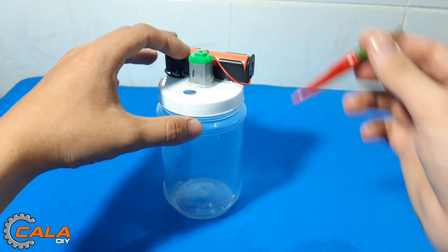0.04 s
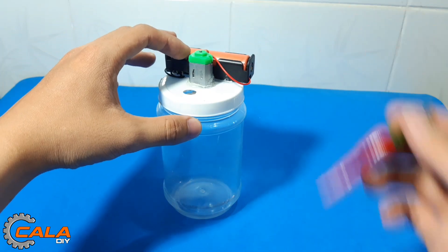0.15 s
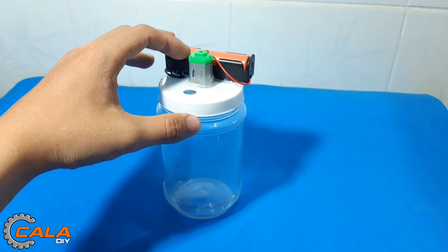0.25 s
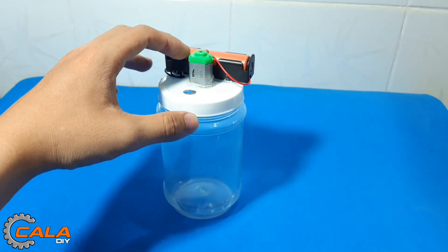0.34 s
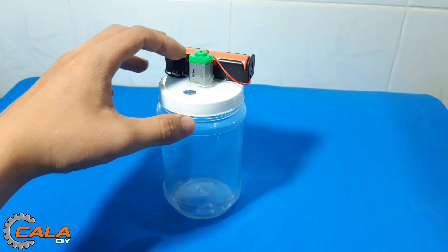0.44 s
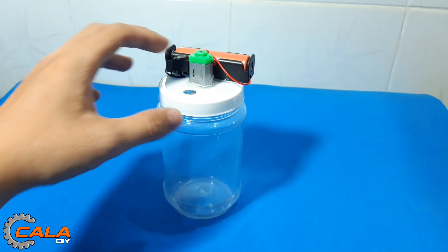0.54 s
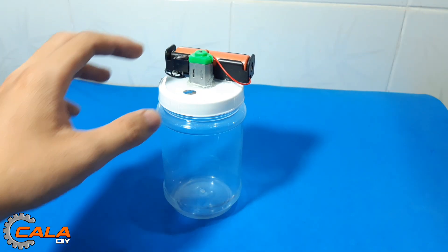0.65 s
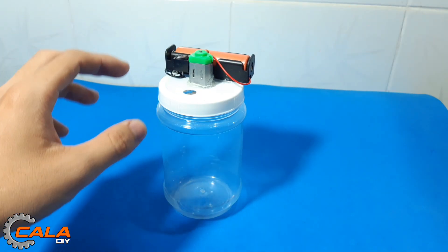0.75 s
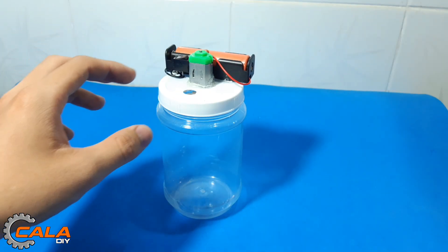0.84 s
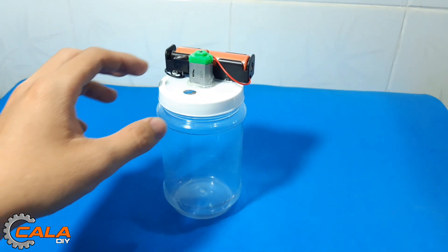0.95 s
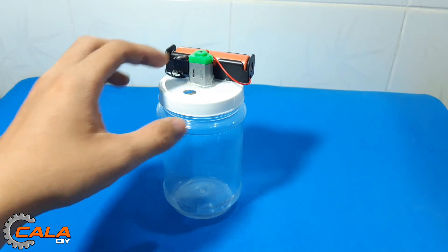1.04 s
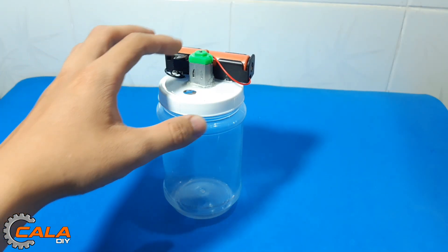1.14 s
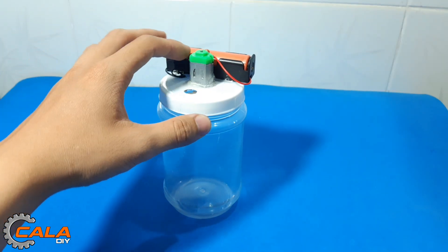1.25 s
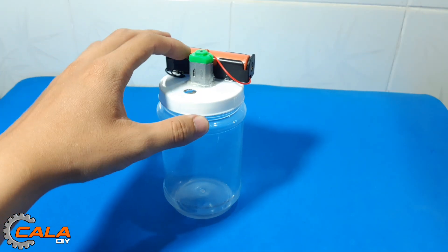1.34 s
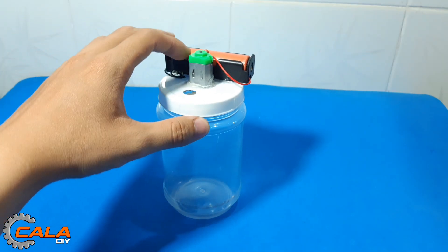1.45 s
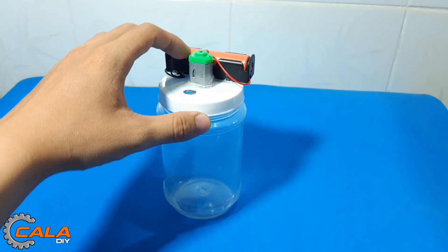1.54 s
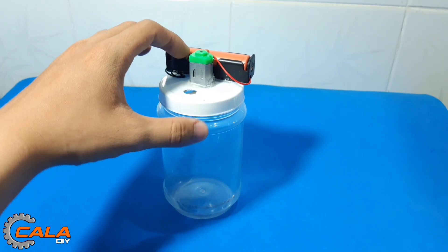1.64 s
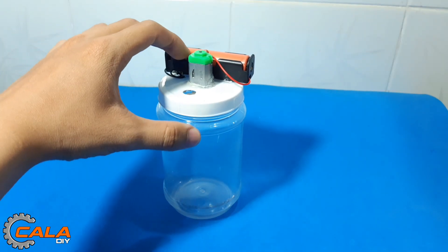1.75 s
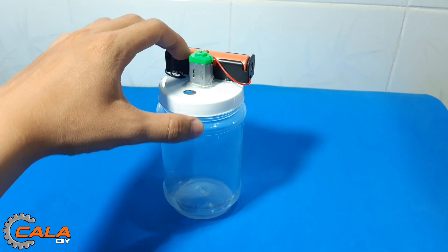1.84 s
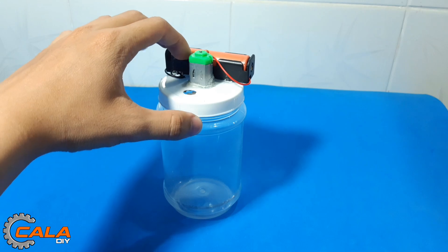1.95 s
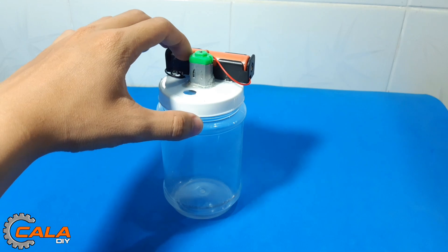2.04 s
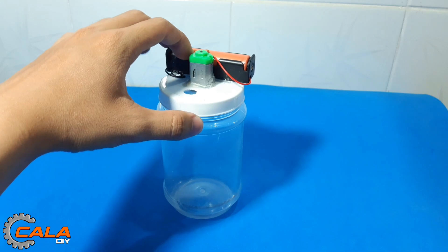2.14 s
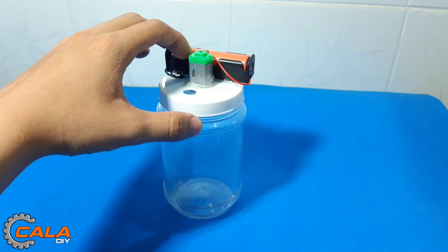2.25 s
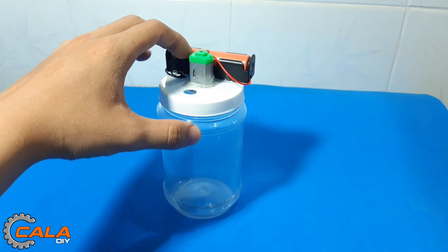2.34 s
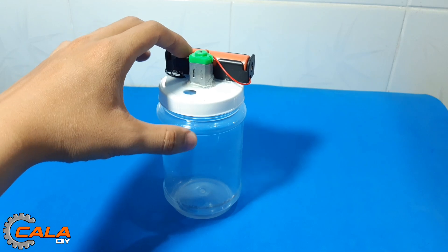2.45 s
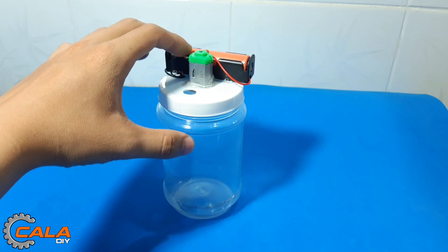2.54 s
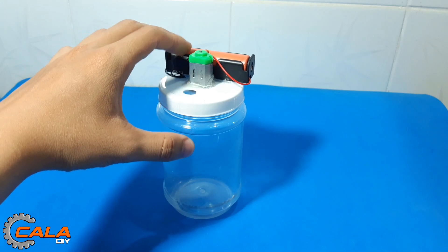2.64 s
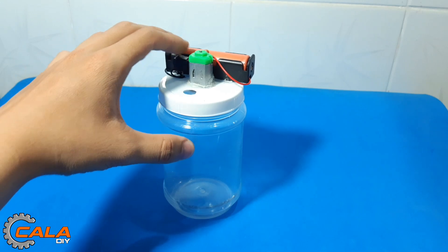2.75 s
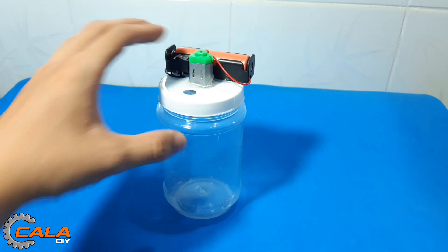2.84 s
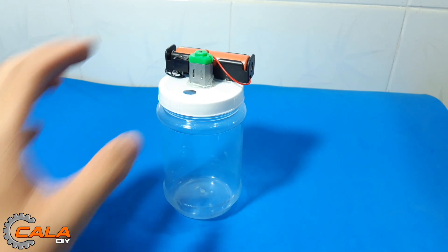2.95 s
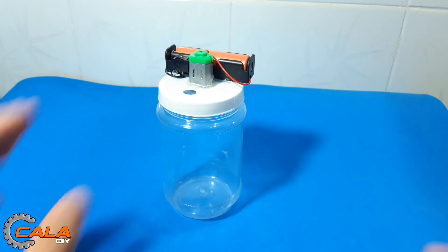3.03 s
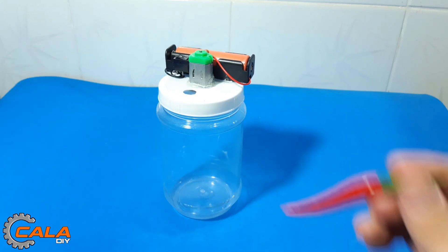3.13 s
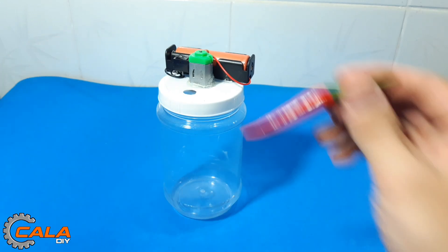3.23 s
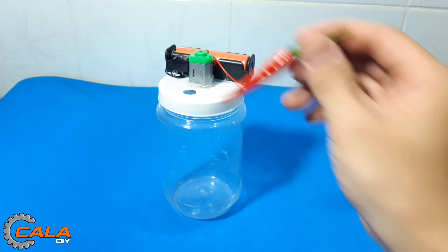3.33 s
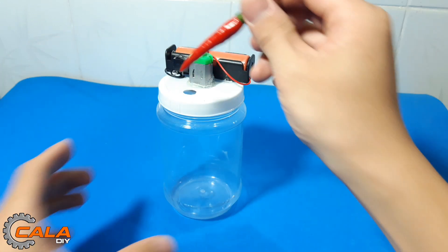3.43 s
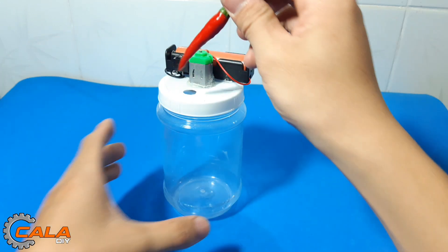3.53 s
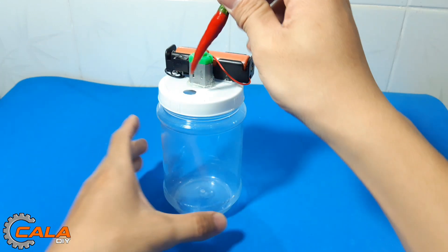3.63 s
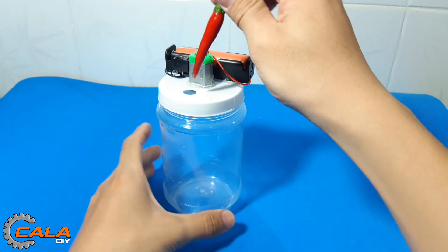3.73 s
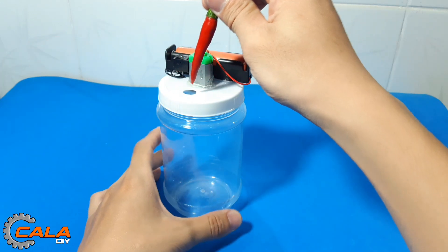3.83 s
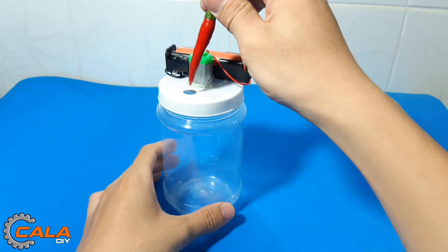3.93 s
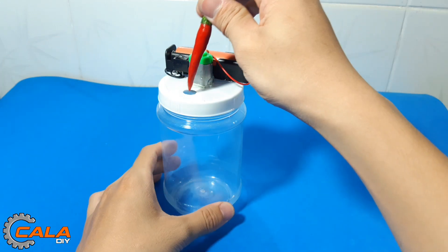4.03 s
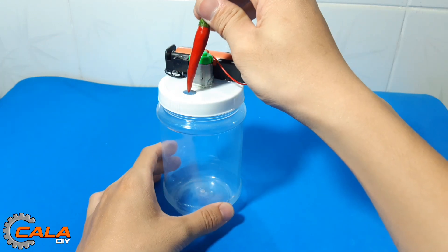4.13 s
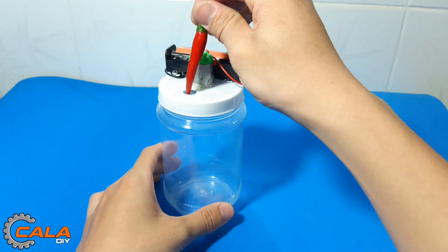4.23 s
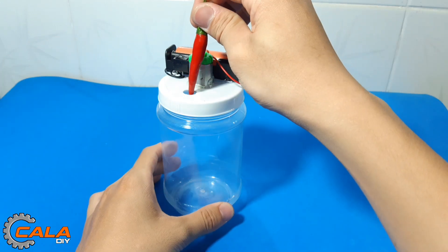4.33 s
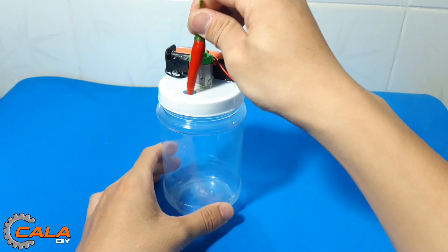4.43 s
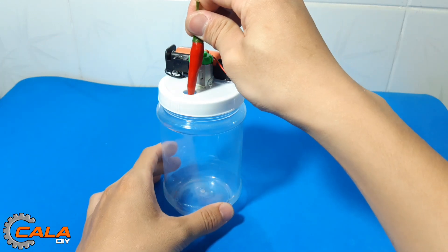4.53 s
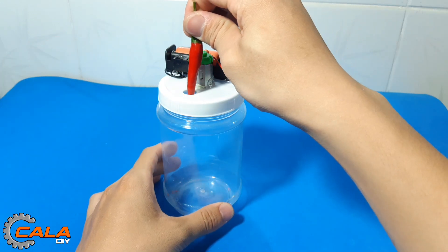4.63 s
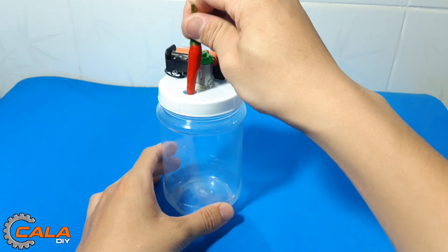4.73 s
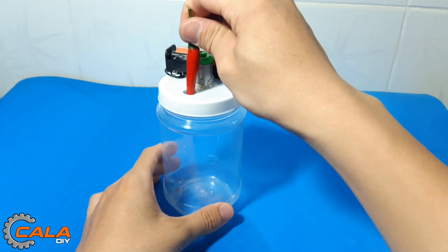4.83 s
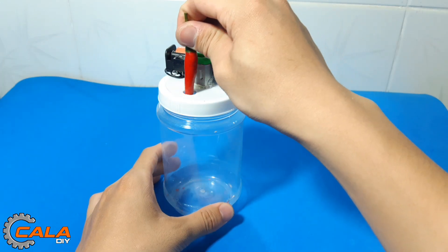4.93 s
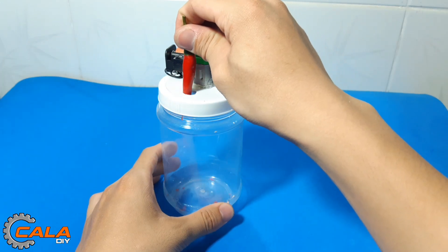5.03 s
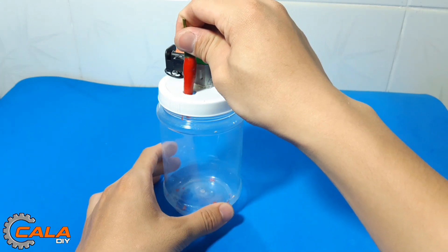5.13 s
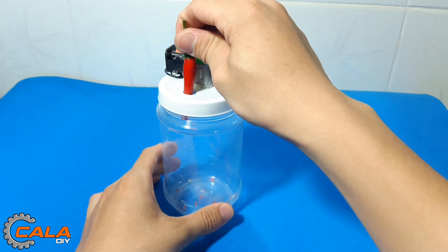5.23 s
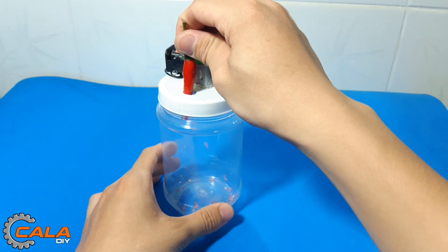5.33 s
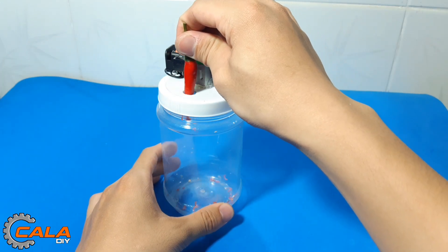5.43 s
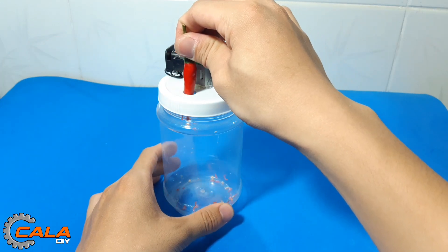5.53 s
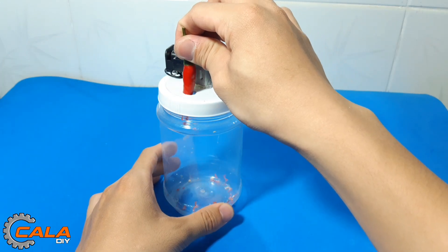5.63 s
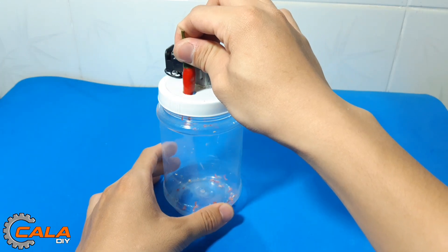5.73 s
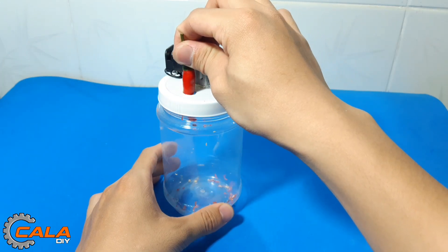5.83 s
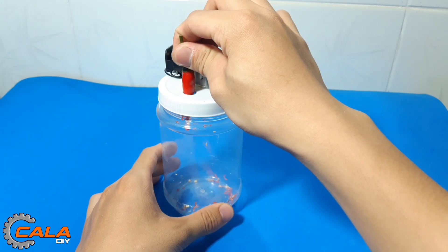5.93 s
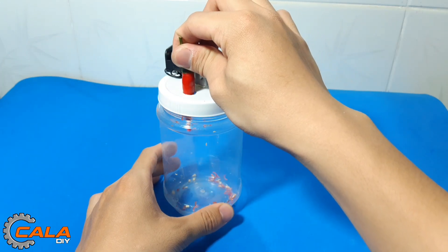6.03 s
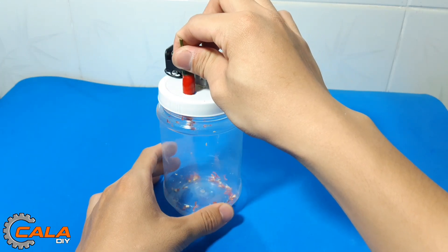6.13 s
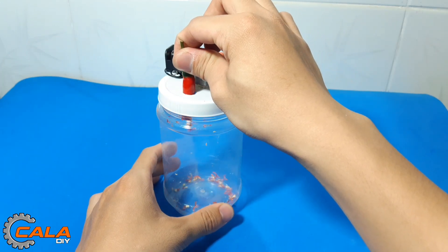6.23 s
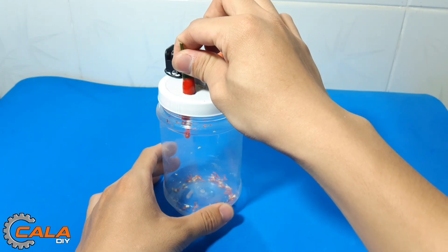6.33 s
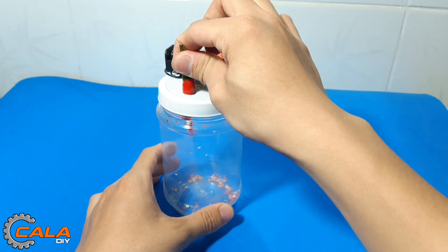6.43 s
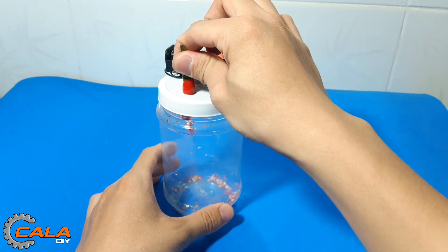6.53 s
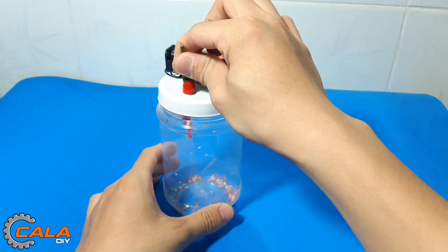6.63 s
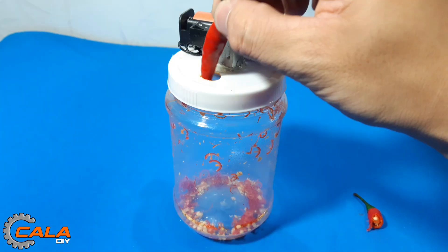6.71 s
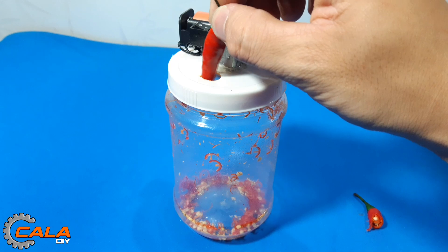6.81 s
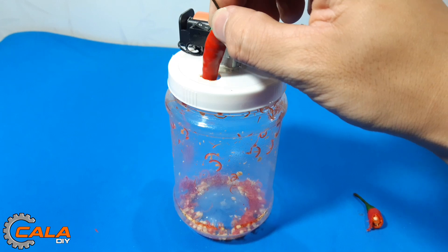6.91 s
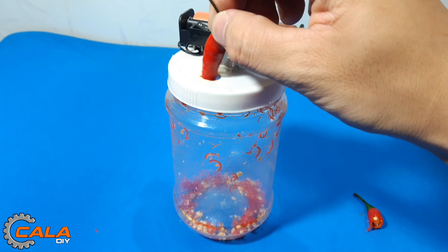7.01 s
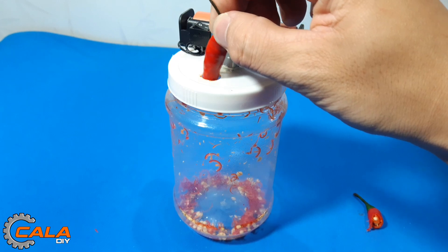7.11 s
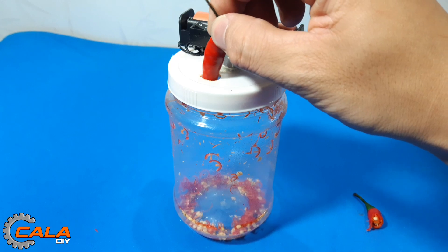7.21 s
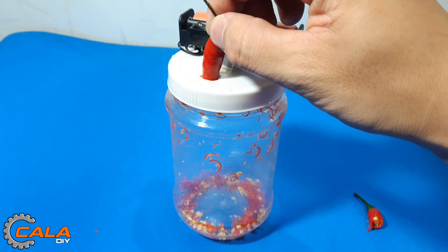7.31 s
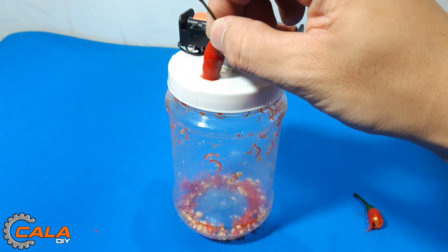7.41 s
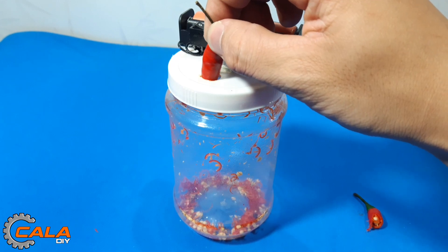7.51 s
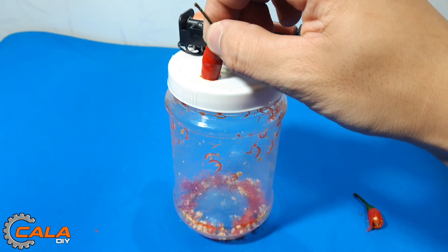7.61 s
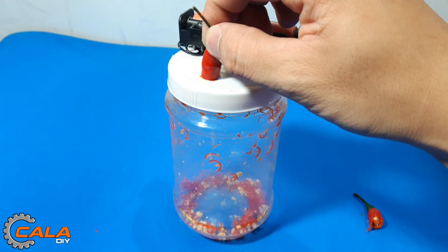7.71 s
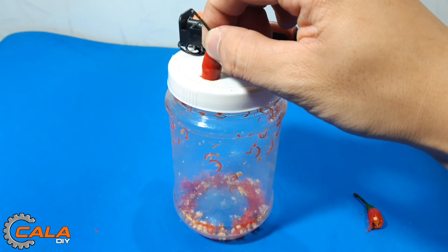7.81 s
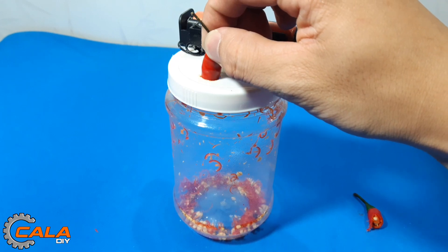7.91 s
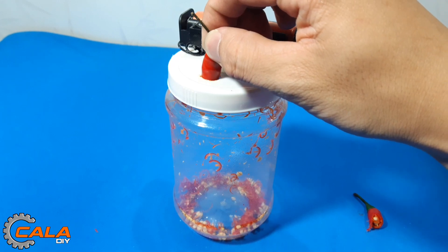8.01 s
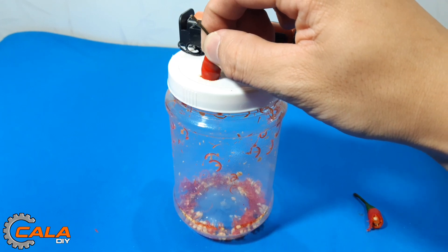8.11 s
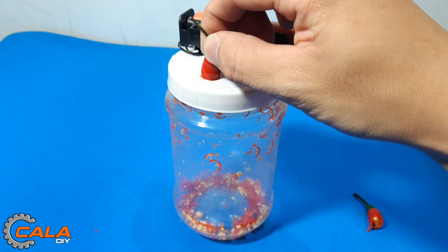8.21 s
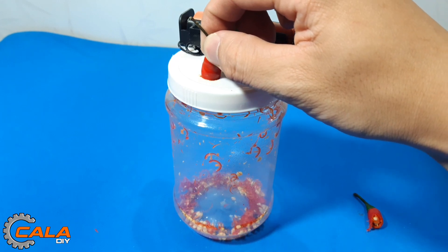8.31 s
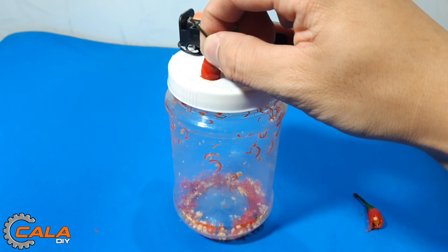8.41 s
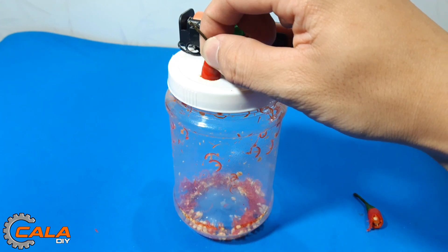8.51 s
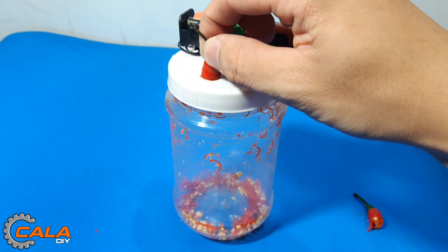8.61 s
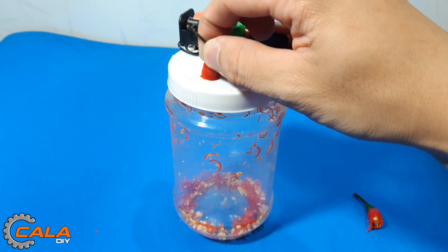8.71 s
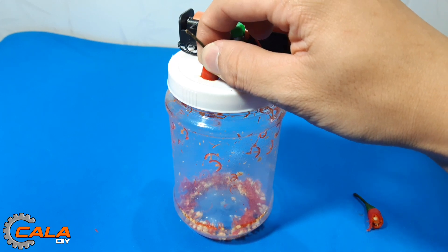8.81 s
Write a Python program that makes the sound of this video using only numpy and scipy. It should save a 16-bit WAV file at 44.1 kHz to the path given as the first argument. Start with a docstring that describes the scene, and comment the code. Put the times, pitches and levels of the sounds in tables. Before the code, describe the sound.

Finger clicks on plastic, then a small motor snaps on and hums steadily atop a jar, until a pepper makes it rattle, growl and nearly stall.

```python
"""A low hum and distant rumble, then a finger clicks on a battery holder, close by in a tiled room.
A small brushed motor on the plastic lid of a jar cracks on, runs up and hums with a comb of shaft orders.
A pepper is fed to its blade, which knocks it once a turn and tears it twice a turn, while the shaft
labours, nearly stalls and recovers. Shaped noise and tones locked to the shaft angle make the machine,
decaying bursts the finger. Two unlike microphone ports stand close by."""
import sys
import numpy as np
from scipy import signal
from scipy.fft import rfft, irfft, next_fast_len
from scipy.io import wavfile
from scipy.ndimage import uniform_filter1d

SR = 44100
rng = np.random.default_rng(int(sys.argv[2]) if len(sys.argv) > 2 else 0)


def waveform_to_disk(signal):
    """Save audio, clipped to [-1, 1], as 16-bit WAV at the path in sys.argv[1]."""
    frames = np.transpose(np.atleast_2d(signal))
    scaled = np.clip(frames, -1, 1) * 32767
    samples = np.round(scaled).astype(np.int16)
    wavfile.write(sys.argv[1], SR, samples)


N = 390726
TIME = np.arange(N) / SR  # s

ON_S, BITE_S = 2.07, 4.249  # switch-on; the pepper first touches the blade
LABOUR_S, LET_GO_S = 4.83, 6.9  # the shaft starts to drum on the lid; the hand lets go of the jar
FULL_HZ = 188.8  # full shaft speed
POLES = 3  # of the commutator

# The labouring shaft. Each row: time in seconds, speed in Hz, level of order two in dB,
# strength of the other orders in dB.
LOADED = [(4.84, 154.4, -43, -10.5), (5.03, 150.5, -41, 1), (5.12, 109.8, -35, -2), (5.17, 109.6, -38, -4),
          (5.26, 154.9, -41, 1), (5.34, 143.7, -46, -0.5), (5.52, 155.6, -40, -5.5), (5.63, 146.5, -43, 1),
          (5.68, 135.8, -32, 7.5), (5.73, 91.5, -43, 0), (5.79, 91.2, -41, -0.5), (6.07, 139.6, -36.5, 0.5),
          (6.16, 94.36, -40, -2), (6.21, 121.5, -34.5, -2), (6.46, 80.2, -55, 1), (6.62, 124.3, -33, 0),
          (6.98, 102.5, -45, -2.5), (7.06, 142, -44, -2), (7.11, 132.3, -34, 4), (7.17, 105.3, -38, 3),
          (7.23, 137.0, -38, -2), (7.29, 146.1, -43, -2), (7.35, 132.6, -35, -1), (7.46, 174.6, -57, 5),
          (7.55, 123.3, -33.5, 2), (7.61, 110.7, -50, -2.5), (7.69, 114.3, -37.5, 1),
          (7.78, 139.7, -41, -1), (7.82, 115.3, -38, 7.5), (7.88, 61.46, -48, -2), (8.01, 51.14, -61, 12),
          (8.1, 85.15, -58, -1), (8.22, 92.3, -43.5, -1), (8.34, 91.3, -46, 0.5), (8.46, 164.2, -46, 1),
          (8.55, 168.6, -66, -2), (8.6, 116.8, -33, 3), (8.65, 106.8, -56, -1), (8.76, 133.9, -36, -2),
          (8.85, 134.0, -50, -5)]
# How alike the two ports hear a spread source. Each row: frequency in Hz, likeness 0-1.
ALIKE = [(100, 0.94), (700, 1), (1400, 0.98), (2500, 0), (4500, 0), (7000, 0.43), (10000, 0)]


def shaft():
    """Speed in Hz, its smoothed rate of change in Hz/s, turns made so far, and whether it is on."""
    # Free at first, then dragged down by the pepper. Each row: time in seconds, run-up speed in Hz.
    speed = [(2.3, 192), (2.54, 192.7), (2.88, 190.7), (2.95, 189.2), (3.11, 190), (3.36, 188.8),
             (3.67, 188.5), (3.82, 190.3), (4.04, 194), (4.24, 192.7), (4.32, 186.2), (4.42, 184.2),
             (4.48, 158.3), (4.66, 175.4), (4.8, 164.9)]
    run_up_s, head_start_s = .07, .015
    on = TIME > ON_S
    since = np.maximum(TIME - ON_S + head_start_s, head_start_s)
    hz = curves(speed + [row[:2] for row in LOADED])[0] * (1 - np.exp(-since / run_up_s))
    gain = uniform_filter1d(np.gradient(hz) * SR, size=SR // 30)
    flutter = 1 + .0009 * wobble(40)
    return hz, gain, np.cumsum(on * hz * flutter) / SR, on


def motor(hz, gain, turns, on):
    """Unbalance, comb of orders, moving air and brushes sound together once the current is on."""
    running = hum(turns) + whine(hz, gain, turns) + air(turns) + sparks(turns) + buzz(hz, turns)
    return contact() + on * running


def hum(turns):
    """Unbalance shakes the lid at the first three orders, until the shaft labours."""
    # The hum as the grip on the jar changes.
    # Each row: time in seconds, rms levels of orders one, two and three in dB.
    hum_levels = [(2.07, -66, -63, -70), (2.15, -50, -36.5, -52), (2.21, -42, -40, -37.5),
                  (2.41, -33.5, -42.5, -36.5), (3.0, -35.5, -39, -35.5), (3.72, -37, -37.5, -34),
                  (4.24, -32, -46, -31), (4.32, -55, -39, -24.5), (4.42, -70, -44, -27.5),
                  (4.5, -51, -39.5, -40), (4.66, -42, -33.5, -39), (4.8, -51, -36, -41.5)]
    tones = 0
    for k, db in enumerate(curves(hum_levels)):
        tones = tones + np.sqrt(2) * amp(db) * np.cos(2 * np.pi * (k + 1) * turns + 1.43 * k)
    return tones * (TIME <= LABOUR_S)


def whine(hz, gain, turns):
    """One turn's waveform repeats with the shaft angle, slowly changing shape."""
    # The comb of weak orders at full speed. Each row: frequency in Hz, relative level in dB.
    comb_levels = [(760, -50), (1500, -57.5), (2500, -54.5), (3500, -52.5), (4400, -54.5), (6000, -56.5),
                   (8200, -66.5), (10500, -60.5), (13000, -61.5), (15400, -65), (19000, -61)]
    # Orders that sing out of the comb: one row of shaft orders.
    singing = (4, 5, 6, 7, 8, 9, 11, 13, 14, 15, 22, 27, 30, 31, 33, 36, 54, 58, 60, 62, 63, 68, 77)
    # Each row: relative level in dB of every singing order, in the same sequence.
    singing_levels = [(-42.5, -55.5, -55, -58.5, -55.5, -48, -54, -54, -44.5, -46, -44.5, -42, -42.5, -54, -55, -52.5, -47, -50, -58, -46.5, -56, -47, -60),
                      (-45, -58, -61, -55, -52, -52, -52, -49, -39.5, -60, -45, -47, -51, -42, -60, -53, -46, -49, -58, -57, -47, -54, -67),
                      (-47, -52.5, -52, -54, -54.5, -42.5, -45, -40.5, -57, -47, -45, -41, -41.5, -54, -63, -55, -50, -48, -41.5, -52, -66, -49, -59)]
    # When each of those rows holds: one row of times in seconds.
    settled_times = (2.92, 3.08, 3.8)
    top_order, scatter_db, smear_turns = 105, 6.5, .012
    loaded = TIME > BITE_S

    order = np.arange(singing[0], top_order + 1)
    comb_db = along(comb_levels, order * FULL_HZ) + scatter_db * rng.standard_normal(len(order))
    comb_db = comb_db - 2 * (order % POLES == 0)  # multiples of three are a little weaker here
    comb = amp(comb_db) * ~np.isin(order, singing)  # outside the singing orders

    # load and run-up shake the timing
    smear = smear_turns * (loaded + .06 + np.clip(gain / 900, 0, 1)) * wobble(400)
    at = (turns + smear) % 1 * 4096
    angle = 2 * np.pi * np.arange(4097)[:, None] / 4096

    def turn(k, size, phase):
        """One turn summed from its orders, read at the shaft angle."""
        wave = (np.sqrt(2) * size * np.cos(k * angle + phase)).sum(1)
        return np.interp(at, np.arange(4097), wave)

    # the comb: a steady turn, and lesser ones that come and go, slowly and fast
    tones = 0
    for share in (1, .7 * wobble(3), .6 * wobble(7), .15 * wobble(60)):
        tones = tones + share * turn(order, comb, rng.uniform(0, 2 * np.pi, len(order)))
    phase = rng.uniform(0, 2 * np.pi, len(singing))
    for db, now in zip(singing_levels, np.eye(len(settled_times))):
        fade = np.interp(TIME, settled_times, now)
        tones = tones + fade * turn(np.array(singing), amp(db), phase) * amp(1.5 * wobble(12))
    # the load damps the whine, which grows steeply with speed
    return amp(-7 * loaded + 75 * np.log10(hz / FULL_HZ)) * tones


def air(turns):
    """Blade wind and brush hiss: noise that swells a little once a turn."""
    # Colour of the wind. Each row: frequency in Hz, relative level in dB per Hz.
    wind_colour = [(60, -16), (190, -9.5), (570, -13), (1000, -24), (1500, -22), (2800, -15), (3600, -29),
                   (5500, -23.5), (7000, -28), (9000, -36), (12000, -25.5), (15500, -34)]
    wind = unit(filtered(pair(ALIKE), lambda f: amp(along(wind_colour, f))))
    catch_s = .02  # time constant of the wind's rise
    level_db = -45 - 24 * np.exp(-np.maximum(TIME - ON_S, 0) / catch_s)
    return amp(level_db) * wind * (1 + .21 * np.cos(2 * np.pi * turns))


def sparks(turns):
    """Brushes spark at each pole during the run-up: noise pulses that swell and die."""
    # Colour of the sparks. Each row: frequency in Hz, relative level in dB per Hz.
    spark_colour = [(700, -23), (1600, -9), (2400, 3), (3300, -12), (5500, -2), (8500, -15), (11500, -3),
                    (15500, -9)]
    rise_s, dies_s = .064, .15
    since = np.maximum(TIME - ON_S, 0)
    pulses = .4 + np.exp(-4 * (POLES * turns % 1))
    noise = rng.standard_normal((2, N)) * pulses * amp(2.5 * wobble(90))
    noise = unit(filtered(noise, lambda f: amp(along(spark_colour, f))))
    return amp(-35) * (1 - np.exp(-since / rise_s)) * np.exp(-since / dies_s) * noise


def contact():
    """The first contact cracks: a brief burst of bright noise at switch-on."""
    noise = unit(np.diff(rng.standard_normal((2, N + 1))))
    level_db = -45 - 60 * np.abs(TIME - ON_S + .0041) / .03  # falls 60 dB in 30 ms
    return (TIME > ON_S - .005) * amp(level_db) * noise


def buzz(hz, turns):
    """The lid rattles once a turn, growing as the free motor runs on and rising with speed."""
    centre_hz, wide_hz, growth_db_per_s = 2740, 550, 4.5
    rattle = rng.standard_normal((2, N)) * (.26 + np.exp(-5 * (turns % 1))) * amp(1.6 * wobble(20))
    rattle = filtered(rattle, lambda f: np.exp(-((f - centre_hz) / wide_hz) ** 2))
    growth_db = growth_db_per_s * (np.minimum(TIME, BITE_S) - ON_S - 1)
    return amp(-49.5 + growth_db + 60 * np.log10(hz / FULL_HZ)) * unit(rattle)


def growl(hz, turns):
    """The labouring shaft drums on the lid at order two, and at others that swell on the lid's modes."""
    # The lid's drum modes.
    # Each row: frequency in Hz, half width in Hz, gain in dB with the jar held, gain in dB once let go.
    lid_modes = [(245, 68, -8, -4), (555, 49, 3.5, -8)]
    # The other orders that drum: one row of shaft orders.
    growl_orders = (1, 3, 4, 5, 6, 7, 8)
    # One row: relative level in dB of each of those orders.
    growl_levels = (-9.5, -1, -0.5, -0.5, -7, -11, 4)
    jolt = .12  # phase unsteadiness of a ragged cut, radians
    _, second_db, others_db = curves(LOADED)

    def near_mode(k):
        gain = amp(-11.5)  # between modes
        for centre, half_width, held_db, free_db in lid_modes:
            peak = np.where(TIME > LET_GO_S, amp(free_db), amp(held_db))
            gain = gain + peak / (1 + ((k * hz - centre) / half_width) ** 2)
        return gain

    angle = 2 * np.pi * turns + jolt * roughness(hz) * wobble(70)
    others = 0
    for k, db in zip(growl_orders, growl_levels):
        others = others + amp(db) * near_mode(k) * (1 + .3 * wobble(18)) * np.cos(k * angle + k * k)
    level = amp(-38.5 + others_db) * np.clip(hz / 95, 0, 1) ** 3  # fades near a stall
    return np.sqrt(2) * (amp(second_db) * np.cos(2 * angle) + level * others) * (TIME > LABOUR_S)


def cutting(hz, turns):
    """The blade knocks the pepper once a turn and tears it twice a turn; both ring lid and jar."""
    # How hard the pepper is fed. Each row: time in seconds, relative level of the cut in dB.
    feed = [(4.26, -21.5), (4.35, -24.5), (4.61, -28), (4.68, -24.5), (5.05, -27.5), (5.07, -26),
            (5.27, -28), (5.32, -23.5), (5.36, -30), (5.39, -22), (5.44, -32), (5.48, -21.5), (5.49, -21),
            (5.5, -26.5), (5.74, -24.5), (5.79, -20), (5.82, -38), (5.85, -20.5), (5.88, -30.5),
            (5.97, -22.5), (6.01, -28.5), (6.11, -21), (6.15, -29.5), (6.24, -24), (6.43, -27.5),
            (6.65, -23.5), (6.71, -27), (6.75, -21), (6.78, -30.5), (6.8, -23.5), (7.05, -31), (7.07, -24),
            (7.17, -25), (7.21, -31.5), (7.24, -24), (7.39, -25.5), (7.43, -31), (7.48, -22), (7.58, -23),
            (7.6, -34.5), (7.62, -23), (7.69, -29), (7.8, -22), (7.9, -36), (8.02, -40), (8.03, -25.5),
            (8.07, -34.5), (8.09, -31), (8.21, -28), (8.22, -25.5), (8.39, -31), (8.4, -22.5), (8.43, -35),
            (8.48, -27.5), (8.61, -22), (8.63, -29), (8.71, -29.5), (8.73, -25), (8.82, -22.5), (8.85, -24)]
    stall_hz = 80
    cut_db = curves(feed)[0] - 1.5 + .04 * wobble(30)
    rough = roughness(hz)
    force = 1.25 * np.sqrt(1 - rough) * knocks(turns, rough) + np.sqrt(rough) * tearing(turns)
    # near a stall little is cut between single chops
    force = amp(cut_db) * force * np.clip(hz / stall_hz, 0, 1) ** 2 * (np.arange(N) > BITE_S * SR)
    return jar(amp(12) * (force + chops()))


def roughness(hz):
    """0-1: the slower the blade, the more the flesh tears."""
    clean, ragged_hz, span_hz = .07, 170, 52  # roughness at speed; tearing grows below, over this span
    return np.clip(clean + np.maximum(ragged_hz - hz, 0) / span_hz, 0, .95)


def knocks(turns, rough):
    """One blunt impulse a turn, its timing and strength more uneven as the cut roughens."""
    at = np.flatnonzero(np.diff(np.floor(turns)))
    late, strength = rng.standard_normal((2, len(at)))
    delay = np.abs(30 * rough[at] ** 2 * late).astype(int)  # samples
    hits = np.zeros(N + 400)
    np.add.at(hits, at + delay, amp(3 * rough[at] * strength))

    def blunt(f):
        """The edge takes time to pass: weaker bass and treble, the treble trailing behind."""
        trail = np.exp(-1j * np.pi * 4e-7 * f * f)
        less_bass = (.5 + 1j * f / 2200) / (1 + 1j * f / 2200)
        return trail * less_bass / (1 + 1j * f / 5500) ** 2

    return filtered(unit(hits[:N]), blunt)


def tearing(turns):
    """Ragged noise with a little less bass, fiercest at the knock and again half a turn later."""
    gate = .8 + np.cos(np.pi * turns) ** 6 + .8 * np.sin(np.pi * turns) ** 6
    noise = unit(pair(ALIKE) * gate * amp(1.8 * wobble(80) + 2.4 * wobble(500)))
    return filtered(noise, lambda f: .45 + .55 * f * f / (f * f + 900 ** 2))


def chops():
    """Hard single chops: noise bursts that swell in milliseconds and are soon over."""
    # Each row: start in seconds, relative force in dB.
    chop_list = [(4.4525, -34), (4.485, -36), (4.8383, -27.5), (4.9086, -35), (5.068, -23.5), (5.313, -27),
                 (5.4858, -30), (5.5703, -29), (5.7544, -27), (5.9714, -42), (6.0719, -28), (6.2456, -27),
                 (6.801, -32), (7.3231, -25), (7.7536, -33), (7.8591, -26), (7.882, -31.5), (7.9052, -26),
                 (7.9259, -32), (7.9475, -29.5), (7.9625, -29.5), (7.9821, -29), (8.0102, -29.5),
                 (8.028, -25), (8.048, -39), (8.1006, -32), (8.1717, -29), (8.2805, -25.5), (8.2959, -34),
                 (8.3973, -35), (8.575, -24)]
    rise_s = .0035
    t = np.arange(SR // 20) / SR
    shape = (t / rise_s * np.exp(1 - t / rise_s)) ** 2
    blows = np.zeros((2, N + len(t)))
    for s, db in chop_list:
        noise = rng.standard_normal(len(t)) + .71 * rng.standard_normal((2, len(t)))  # shared and own
        blows[:, round(s * SR):][:, :len(t)] += amp(db + 2.5) * shape * noise
    return blows[:, :N]


def jar(force):
    """Lid and jar turn the force into sound through sharp modes that depend on the grip."""
    # What they radiate when the blade bites. Each row: frequency in Hz, gain in dB.
    radiated = [(100, -22), (260, 0), (400, -9.5), (570, -3), (930, -10), (1100, -9), (1400, -9),
                (1950, -0.5), (2250, -2.5), (2570, 0), (2850, -1.5), (3150, -3.5), (3500, -8.5),
                (4400, -6.5), (5600, -5), (7000, -12.5), (9000, -16), (12000, -14.5), (15500, -18)]
    # Their sharp modes.
    # Each row: frequency in Hz, width in Hz, boost in dB with the jar held, boost in dB once let go.
    ring_modes = [(572, 52.2, 7, 2), (827, 100, 3, 7), (1955.3, 110, 4, 7.5), (2193.7, 63, 6.5, -5.5),
                  (2542, 184, 7, 3), (3133, 136, 7.5, 11.5), (4110, 490, 5, 1.5), (5790, 130, 6, 0)]
    held_column, free_column = 2, 3

    def body(f, column, extra_db=0):
        gain_db = along(radiated, f)
        for row in ring_modes:
            gain_db = gain_db + (row[column] + extra_db) / (1 + ((f - row[0]) / row[1] * 2) ** 2)
        return amp(gain_db)

    first = np.arange(N) < LABOUR_S * SR
    force = np.where(first, force, patchy(force, depth_db=2.5))
    # the grip on the jar shifts all the time, and with it the modes that ring
    held = np.clip((np.arange(N) < LET_GO_S * SR) * 1.27 + .063 + .28 * wobble(9), 0, 1)
    later = causal(force * ~first * held, lambda f: body(f, held_column))
    later = later + causal(force * ~first * (1 - held), lambda f: body(f, free_column))
    # at first the pepper's hard tip meets the fast blade and rings 2300-3500 Hz more
    tip = causal(force * first, lambda f: body(f, held_column, extra_db=7 * (abs(f - 2900) < 600)))
    return later + tip


def patchy(x, depth_db):
    """x with its colour drifting in patches a few hundred Hz wide and some 30 ms long."""
    z = signal.stft(x, nperseg=512)[2]
    field = uniform_filter1d(rng.standard_normal(z.shape[1:]), size=4, axis=0)
    field = unit(uniform_filter1d(field, size=5, axis=1))
    return signal.istft(z * amp(depth_db * field), nperseg=512)[1][:, :N]


def finger():
    """Short plastic clicks on the holder, decaying noise, each with a dull decaying thud in the jar."""
    # Each row: start in seconds, relative level of the click in dB, level of the thud in dB.
    taps = [(0.405, -45, -29), (0.412, -36.5, -45), (0.42, -38, -43), (0.427, -47, -44), (0.433, -59, -36),
            (0.455, -62, -38), (0.467, -51, -43)]
    # Colour of a click. Each row: frequency in Hz, gain in dB.
    click_colour = [(710, -45), (1200, -16), (2980, -6), (4430, -1), (4830, -8), (5670, -1.5), (7900, -20),
                    (15500, -15)]
    t = np.arange(SR // 10) / SR
    clicks, thuds = np.zeros((2, 2, N))
    for s, db, thud_db in taps:
        span = slice(round(s * SR), round(s * SR) + len(t))
        # 60 dB down after 22 ms and 6.3 ms
        clicks[:, span] += amp(db - 60 * t / .022) * rng.standard_normal((2, len(t)))
        thuds[:, span] -= amp(thud_db - 60 * t / .0063) * np.sin(2 * np.pi * 380 * t)
    return amp(8.5) * causal(clicks, lambda f: amp(along(click_colour, f))) + thuds


def tiles(x):
    """The tiled room answers with noise in which each frequency dies at its own speed."""
    # Each row: frequency in Hz, time to fall 60 dB in seconds.
    decay = [(200, .3), (3000, .2), (12000, .12)]
    hz, t, z = signal.stft(rng.standard_normal((2, SR // 2)), SR, nperseg=256)
    tail = signal.istft(z * amp(-60 * t / along(decay, hz)[:, None]), SR, nperseg=256)[1]
    late = np.pad(x, ((0, 0), (200, 0)))  # samples before the answer starts
    return signal.oaconvolve(late, tail / np.linalg.norm(tail[0]), axes=1)[:, :N]


def ports(x):
    """The microphone ports share the power unevenly by frequency, and the right hears slightly later."""
    # Left over right port. Each row: frequency in Hz, level ratio in dB.
    lean = [(200, 0), (600, -2), (1500, -1), (3000, -2), (4000, -5), (5500, -8), (6500, -1), (7400, 11),
            (8000, 36), (8600, 18), (10000, 11), (12000, 3), (13500, 0), (15500, -4)]
    lag_s = np.array([[0], [.00014]])

    def response(f):
        ratio = amp(2 * along(lean, f))  # of power
        share = np.sqrt(2 / (1 + ratio) * np.array([ratio, np.ones_like(f)]))
        return share * np.exp(-2j * np.pi * f * lag_s)

    return filtered(x, response)


def background():
    """Broad rumble, narrow drones of far machines, a steady low hum and the ports' own hiss."""
    # Far machinery. Each row: frequency in Hz, relative level in dB per Hz.
    rumble_colour = [(21, -35), (45, -10), (118, -10), (224, -10), (344, -7), (458, -10), (510, -12),
                     (769, -13.5), (1120, -29.5), (2330, -37), (2500, -43), (3250, -88), (5500, -120)]
    # Narrow drones. Each row: frequency in Hz, width in Hz, approximate rms level in dB.
    drones = [(85.4, 5, -68), (104, 10, -65.5), (113.4, 17, -61), (343, 10, -61.5), (386, 16, -73),
              (510, 5, -72.5), (1800, 89, -81.5)]
    # The ports' own hiss. Each row: frequency in Hz, relative level in dB per Hz.
    hiss_colour = [(1500, -20), (2300, -4), (3200, -7), (4800, -4), (5400, 0), (6200, -6), (8000, -9),
                   (11000, -8), (14500, -3), (15800, -4)]
    rumble = pair([(100, .99), (500, .62), (1000, .1)])
    rumble = unit(filtered(rumble, lambda f: amp(along(rumble_colour, f))))
    rumble_db = -59 + 3.1 * wobble(5.5) + np.array([[-1.2], [1.2]])  # the right port hears more
    hiss = unit(filtered(rng.standard_normal((2, N)), lambda f: amp(along(hiss_colour, f))))

    def lines(f):
        power = sum(amp(2 * db) / w * np.exp(-((f - c) / w * 2) ** 2) for c, w, db in drones)
        return np.sqrt(power * SR / 2)

    far = filtered(pair([(100, .95), (1000, .18)]), lines)
    low_hum = amp(-63.5 + wobble(3)) * np.sqrt(2) * np.sin(2 * np.pi * 53.3 * TIME)
    return amp(rumble_db) * rumble + low_hum + amp([[-80], [-76]]) * hiss + far


def amp(db):
    """Amplitude of a level in dB."""
    return np.exp(np.asarray(db) * np.log(10) / 20)


def unit(x):
    """x at an rms of one."""
    return x / np.sqrt(np.mean(x ** 2) + 1e-20)


def along(points, hz):
    """(Hz, value) points read on a log axis of frequency."""
    f, v = np.transpose(points)
    return np.interp(np.log(hz + 1), np.log(f + 1), v)


def curves(rows):
    """One value per sample for each column after the time."""
    s, *cols = np.transpose(rows)
    return [np.interp(TIME, s, c) for c in cols]


def wobble(rate):
    """A random curve, rate knots a second."""
    knots = rng.standard_normal(int(N * rate / SR) + 4)
    return np.interp(np.arange(N) * rate / SR, np.arange(len(knots)), knots)


def filtered(x, response):
    """x times a complex response of frequency."""
    m = next_fast_len(N + 8192, real=True)
    return irfft(rfft(x, m) * response(np.fft.rfftfreq(m, 1 / SR)), m)[..., :N]


def causal(x, gain):
    """x through the minimum-phase filter of that gain, built by folding its cepstrum."""
    cepstrum = irfft(np.log(gain(np.fft.rfftfreq(8192, 1 / SR)) + 1e-6))
    cepstrum[1:4096] *= 2
    cepstrum[4097:] = 0
    impulse = irfft(np.exp(rfft(cepstrum)))[None, :3000]
    return signal.oaconvolve(x, impulse, axes=1)[:, :N]


def pair(alike):
    """White noise for two ports, as alike as the table says."""
    def mix(hz):
        angle = np.arccos(np.clip(along(alike, hz), 0, 1)) / 2
        return np.array([np.cos(angle), np.sin(angle)])

    mid, side = filtered(rng.standard_normal((2, N)), mix)
    return np.array([mid + side, mid - side])


def scene():
    """Motor, cut and finger reach the ports directly and off the tiles, over the background."""
    hz, gain, turns, on = shaft()
    spin = motor(hz, gain, turns, on) + growl(hz, turns)
    strikes = cutting(hz, turns) + finger()
    room = tiles(amp(-19) * spin + amp(-4) * strikes)
    return ports(spin + strikes + room) + background()


def record(dry):
    """Nothing is kept above the band limit nor in the deepest bass."""
    top_hz, bottom_hz = 15650, 47
    return filtered(dry, lambda hz: 1 / (1 + (hz / top_hz) ** 200) / (1 + (bottom_hz / (hz + 1)) ** 10))


dry = scene()
out = record(dry)
waveform_to_disk(out)
```